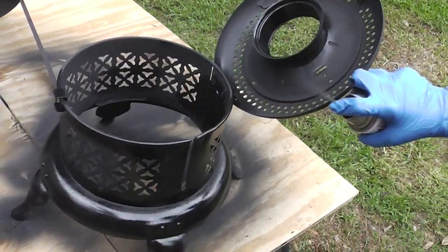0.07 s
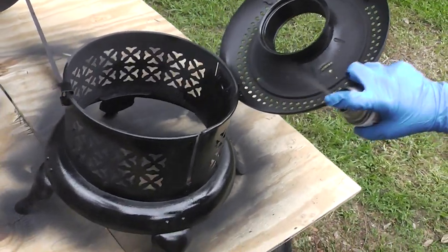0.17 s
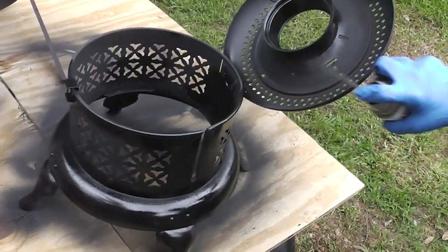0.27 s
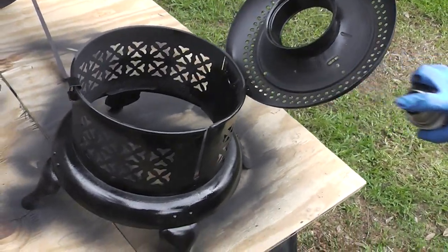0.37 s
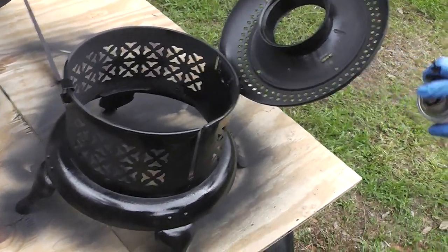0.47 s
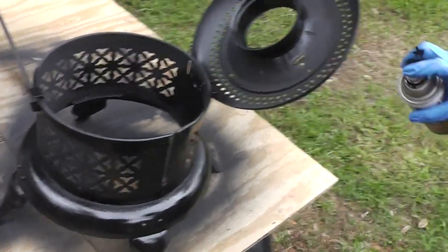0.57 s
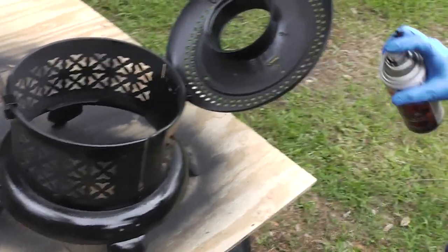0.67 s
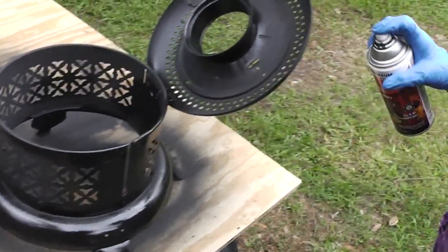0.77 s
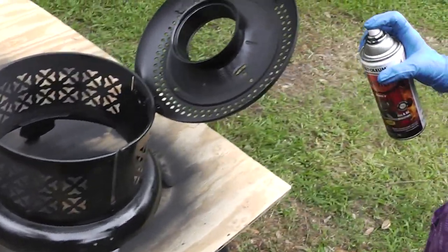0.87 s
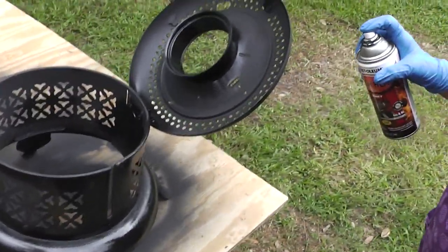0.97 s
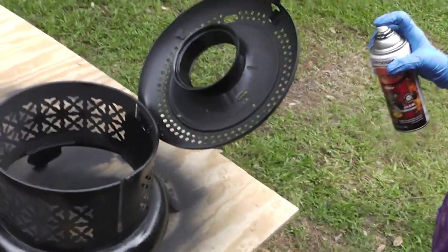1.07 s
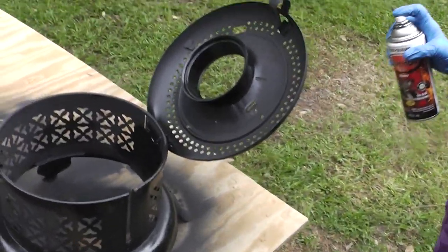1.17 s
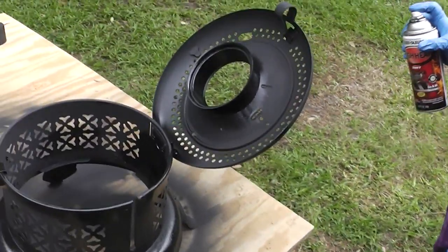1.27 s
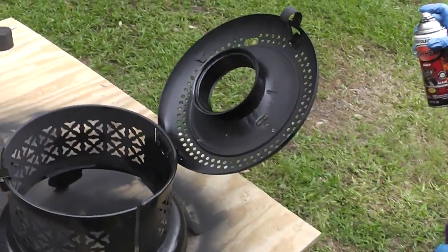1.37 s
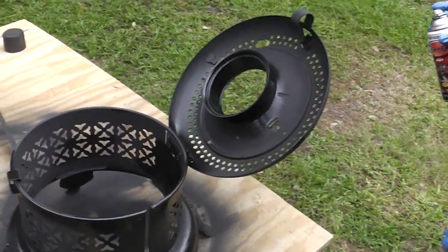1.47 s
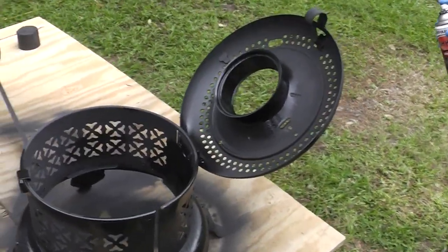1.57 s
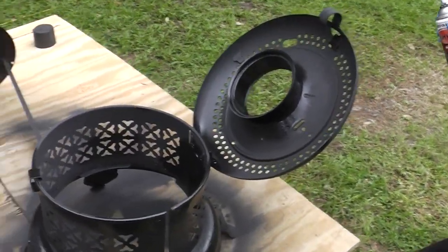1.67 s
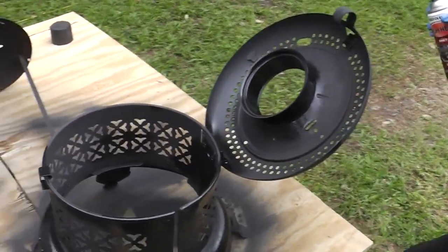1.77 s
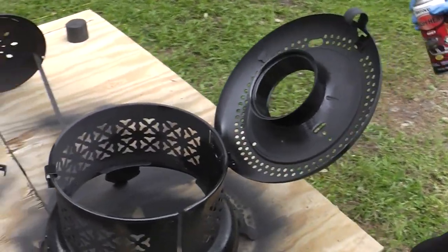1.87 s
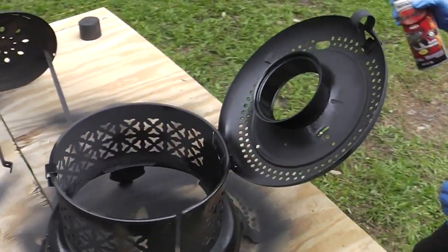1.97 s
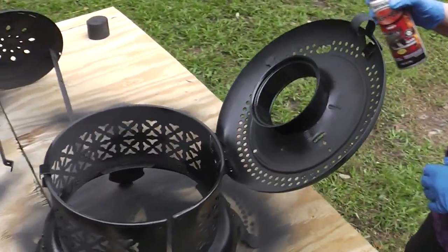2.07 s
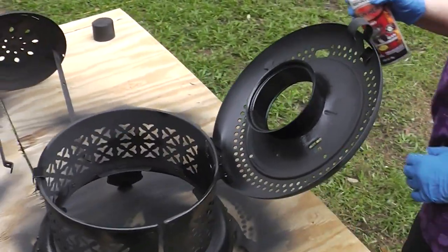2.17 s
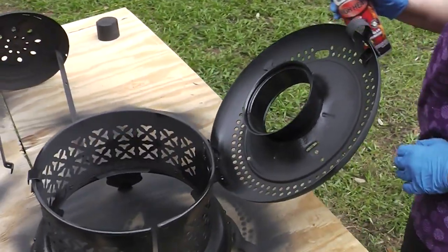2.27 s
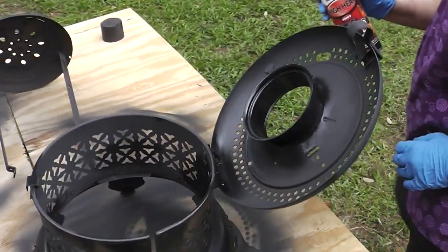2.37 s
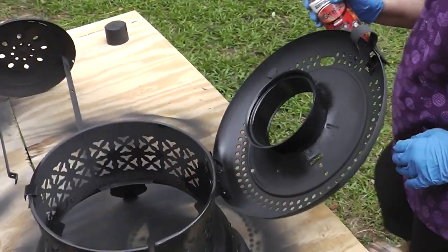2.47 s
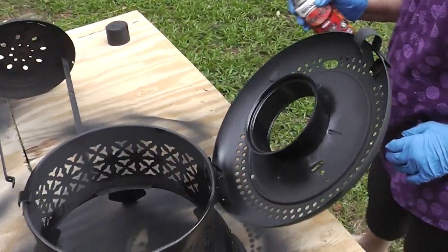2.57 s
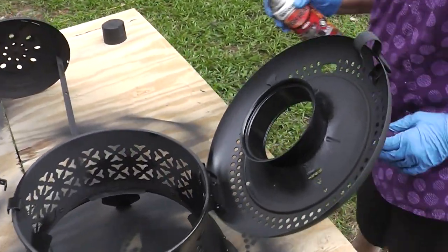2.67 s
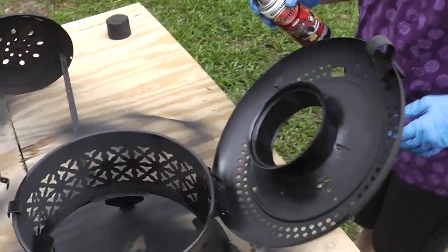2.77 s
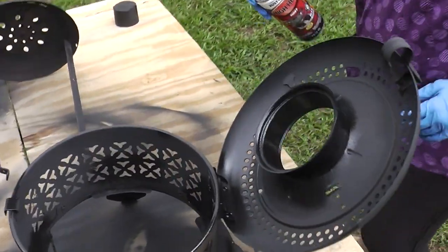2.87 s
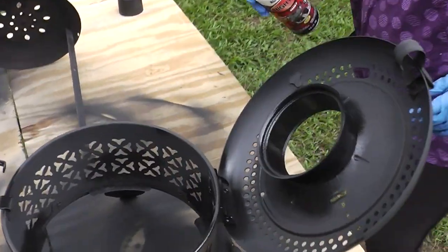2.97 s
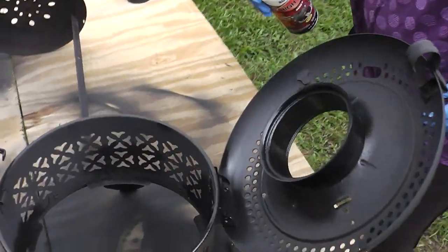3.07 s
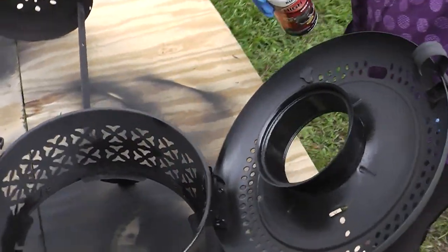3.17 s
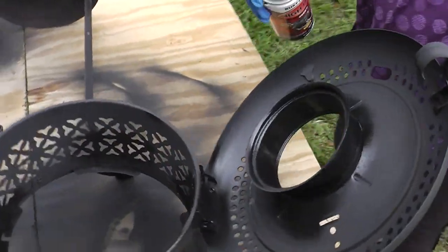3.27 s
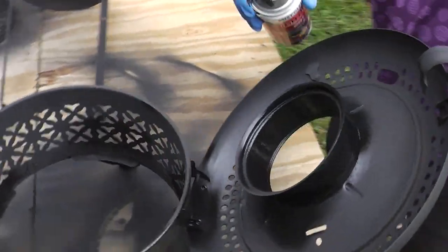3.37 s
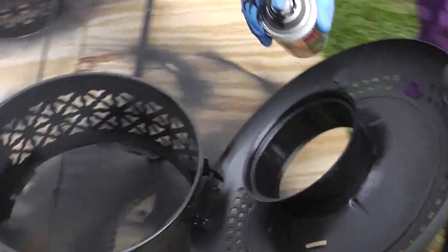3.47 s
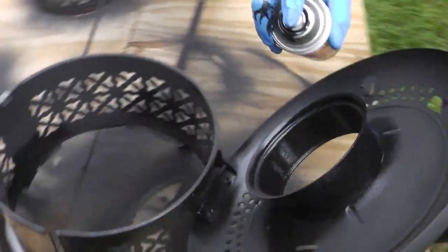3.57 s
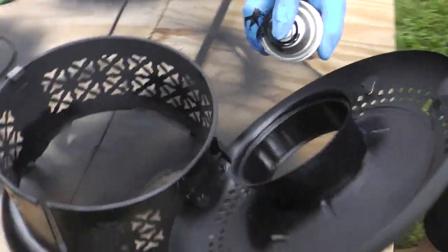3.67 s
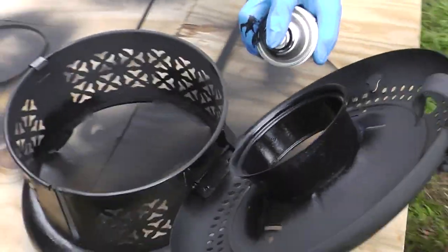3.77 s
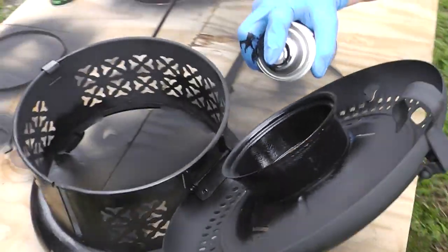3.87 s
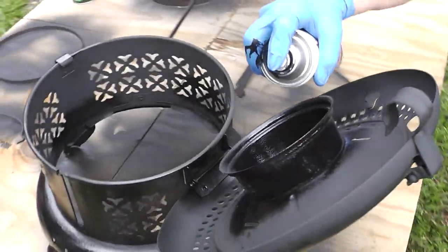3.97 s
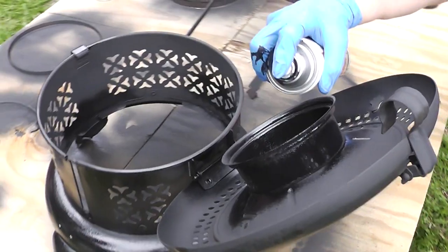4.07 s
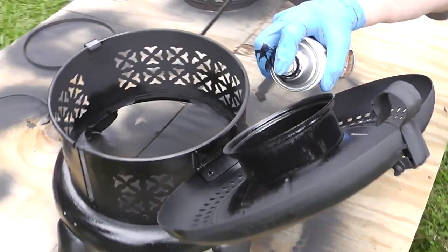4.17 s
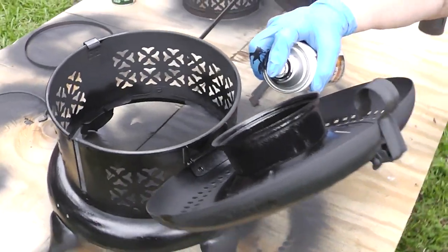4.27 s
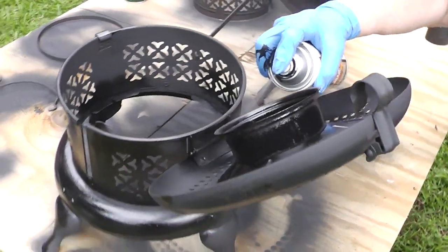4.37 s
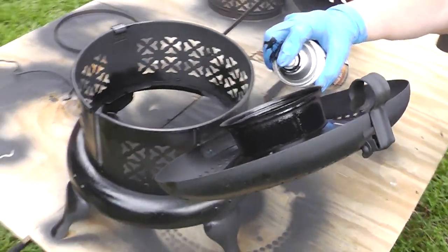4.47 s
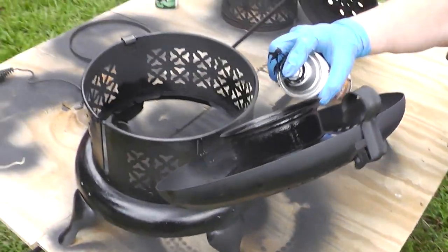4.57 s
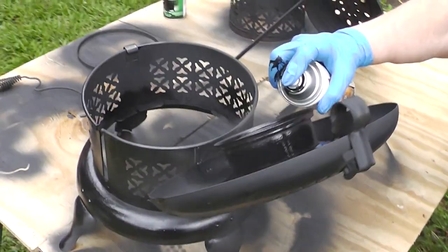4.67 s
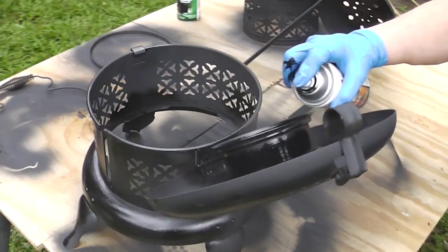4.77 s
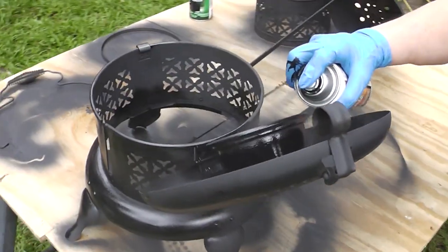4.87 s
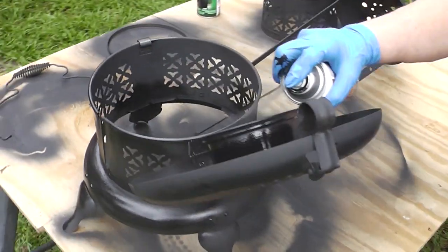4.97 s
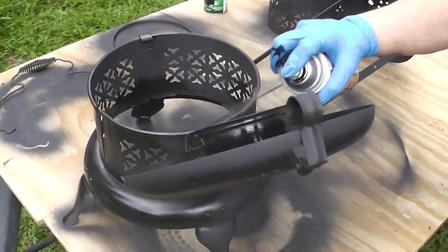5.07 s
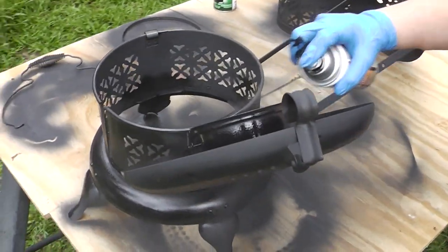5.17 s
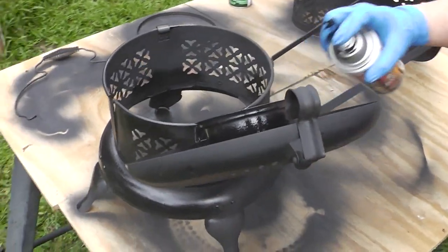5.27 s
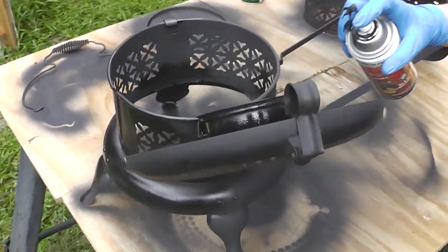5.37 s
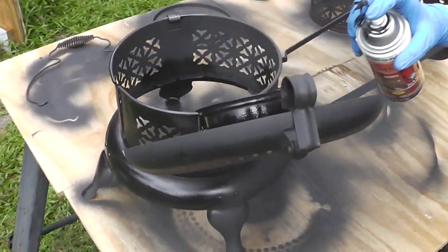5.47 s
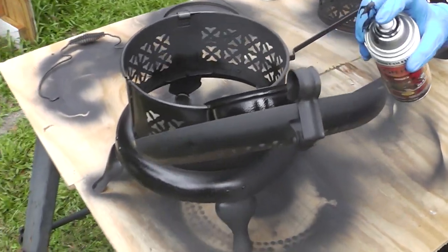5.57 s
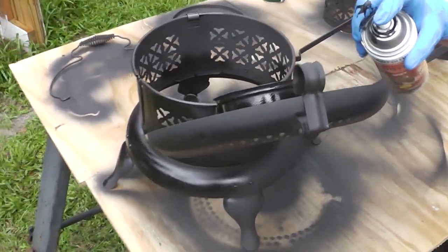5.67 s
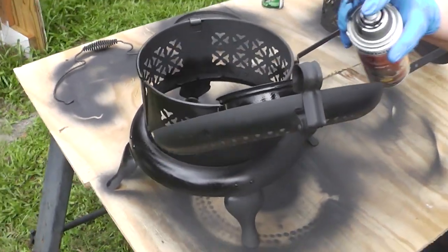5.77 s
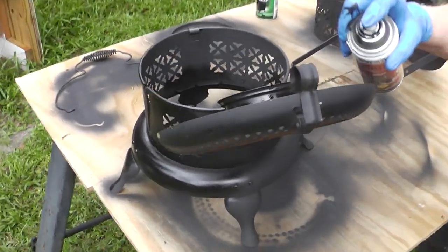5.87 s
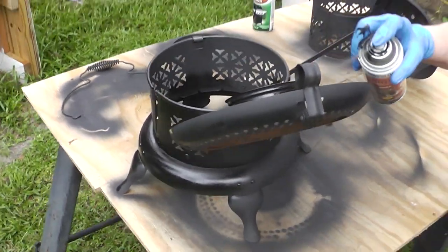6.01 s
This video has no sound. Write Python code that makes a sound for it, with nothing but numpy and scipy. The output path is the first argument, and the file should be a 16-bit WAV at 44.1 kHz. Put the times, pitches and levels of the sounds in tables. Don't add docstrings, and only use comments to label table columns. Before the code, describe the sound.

A crisp, turbulent aerosol jet cuts off, followed by a quick irregular rattle inside the can. A quieter stretch holds soft clothing movement, tiny metallic clicks, thin high bird notes blurred by trees and faint far calls, above steady low traffic. Then the hiss returns for about a second, its colour shifting as the hand moves near metal, pauses, and begins again. Close spraying, open air, sound leaning right.

```python
import sys
import numpy as np
from scipy import signal
from scipy.fft import rfft, irfft
from scipy.io import wavfile
from scipy.ndimage import uniform_filter1d, minimum_filter1d, map_coordinates

SR = 44100
rng = np.random.default_rng(int(sys.argv[2]) if len(sys.argv) > 2 else 0)


def voltage_ratio(decibels):
    exponent = np.asarray(decibels, float) / 20
    return 10 ** exponent


def unload_wav(signal):
    wavfile.write(
        sys.argv[1],
        SR,
        np.round(np.clip(np.atleast_2d(signal).T, -1, 1) * 32767).astype(np.int16),
    )


N = 266364
T = np.arange(N) / SR
HZ = np.maximum(np.fft.rfftfreq(N, 1 / SR), 1)


def over_hz(table):
    hz, value = np.transpose(table)[:2]
    return np.interp(np.log(HZ), np.log(hz), value)


def over_time(table):
    s, *columns = np.transpose(table)
    return [np.interp(T, s, c) for c in columns]


def shape(x, gain):
    return irfft(rfft(x) * gain, N)


def split(x, edges_hz, soft):
    lows = [0] + [1 / (1 + (HZ / e) ** (1 / soft)) for e in edges_hz] + [1]
    spectrum = rfft(x)
    return [irfft(spectrum * (b - a), N) for a, b in zip(lows, lows[1:])]


def unit(x):
    return x / np.sqrt(np.mean(x ** 2))


def walk(rate):
    k = int(SR / rate)
    held = np.repeat(rng.standard_normal(N // k + 1), k)
    return 1.57 * uniform_filter1d(uniform_filter1d(held, k), k)[:N]


def ramp(start, end, rise, fall):
    return np.clip(np.minimum((T - start) / rise, (end - T) / fall), 0, 1)


def echoes(x, delays_ms, shares):
    crisp = shape(x, 4 / (3 + np.cos(2 * np.pi * HZ / SR)))
    out = 0
    for ms, share in zip(delays_ms, shares):
        place = np.arange(N) - ms * SR / 1000
        out = out + share * map_coordinates(crisp, [place], order=2, prefilter=False)
    return out


# (frequency [Hz], level [dB])
PORT_LEVEL = [(60, -3.0), (110, -3.0), (200, -3.0), (380, -3.0), (700, -18), (1290, -2), (2380, -1),
              (4400, 1.5), (8120, -4), (15000, -3)]
# (frequency [Hz], phase [radians])
PORT_PHASE = [(0, 0), (1120, 0.5), (1890, 0.28), (7410, 0.35), (9650, 0.028), (11300, 0.061), (12000, 1.3),
              (12200, 0.78), (12800, 1.8), (13300, 1.5), (13500, 1.6), (14300, 0.3), (16400, 0.0)]
# (frequency [Hz], level [dB])
PORT_NOTCH = [(6000, 0), (9500, 1.5), (11800, -5.5), (13200, -0.5), (14500, 9), (16000, 14)]
# (frequency [Hz], likeness [0-1])
PORT_LIKENESS = [(1000, 1), (2500, 1), (9000, 1), (11500, 0.87), (13800, 0.74), (15800, .75)]


def from_right(x, unlike=None):
    tilt_db = over_hz(PORT_LEVEL) + over_hz(PORT_NOTCH)
    tilt = voltage_ratio(tilt_db / 2) * np.exp(.5j * over_hz(PORT_PHASE))
    alike = over_hz(PORT_LIKENESS)
    mid = rfft(x) * np.sqrt((1 + alike) / 2)
    side = 0 if unlike is None else rfft(unlike) * np.sqrt((1 - alike) / 2)
    return np.array([irfft((mid + side) * tilt, N), irfft((mid - side) / tilt, N)])


# (opens [s], press takes [s], shut [s], jet level [dB])
PRESSES = [
    (-.2, .05, .439, -25),
    (4.297, 0.059, 5.264, -23),
    (5.873, 0.12, 6.3, -22.5),
]


def valve_flow():
    let_go, snap, snap_share = 0.036, 0.011, 0.094
    jet_gain = mist_gain = 0
    for opens, press, shut, db in PRESSES:
        eased = ramp(opens, shut, press, let_go)
        snapped = ramp(opens + .004, shut, snap, snap)
        valve = (1 - snap_share) * eased + snap_share * snapped
        dribble = (T > shut - let_go) * voltage_ratio(-42 - 60 * np.abs(T - shut) / 0.18)
        jet_gain = jet_gain + voltage_ratio(db) * (valve ** 1.56 + dribble)
        mist_gain = mist_gain + voltage_ratio(db) * (valve ** 0.91 + 4 * dribble)
    return jet_gain, mist_gain


# (frequency [Hz], level per Hz [dB])
JET_COLOUR = [(600, -24), (1300, -4), (2200, -8.5), (2750, -17.5), (3200, -23), (3700, -24), (4300, -19),
              (5800, -14.5), (7300, -8), (8300, -3), (10500, 2), (12200, 0.5), (13300, -1), (16000, -2)]
# (time [s], landing on metal [0-1], turned to camera [0-1], hidden by the lid [0-1])
AIM = [(0, 1, 0, 0), (.05, 0.79, 0.4, 0), (.33, 0.71, 0.5, 0), (.4, 0.65, 0, 0.5), (4.35, 0.12, 0.2, 0),
       (4.4, 0.32, 0.4, 0.45), (4.65, 0.51, 0.8, 0.06), (4.79, 0.5, 0, 0.96), (4.85, 0.78, .85, 0.34),
       (5.0, 0.47, 0.5, 0.56), (5.12, 0.27, 0.1, 0.95), (5.165, 0.56, 0.2, 1), (5.23, 0.48, 0, 1),
       (5.9, 0.41, 0, 0), (6.04, 0.5, 0, 0.1)]
# (time [s], blowing into the pot [0-1], drumming on the lid [0-1])
MIST = [(0, 0.3, .9), (.12, 0.8, 1), (.4, .1, 0.6), (4.35, 0.5, 0.9), (4.55, 0.35, .7), (4.72, 0.4, 0.1),
        (4.79, .3, .1), (4.83, 0.5, 0), (4.93, .8, 0), (4.98, 0, 0.1), (5.1, 0.1, 0.5), (5.25, 0.7, 0.5),
        (5.9, 0, 0), (6.04, 0, 0)]
# (time [s], lid echo [ms], share, pot echo [ms], share, board echo [ms], share)
HAND = [(0, .26, .22, .65, 0, 1.77, .15), (.07, .26, .15, .645, -.28, 1.6, 0),
        (.13, .26, .12, .65, -.1, 1.11, 0), (.18, .255, .14, .65, 0, 1.105, -.28),
        (.25, .25, .1, .66, -.1, 1.11, -.22), (.31, .255, .1, .65, -.22, 1.11, -.34),
        (.36, .26, .12, .63, -.15, 1.11, -.05), (.42, .27, .2, .6, 0, 1.02, -.15),
        (4.3, .455, .5, .95, .2, 1.43, .15), (4.4, .46, .5, .955, .22, 1.43, .15),
        (4.48, .485, .35, .965, .2, 1.44, -.15), (4.55, .51, .25, .97, .15, 1.44, 0),
        (4.6, .4, 0, .85, 0, 1.42, -.1), (4.68, .345, .2, .7, -.12, 1.43, -.18),
        (4.76, .335, .2, .745, .15, 1.47, .1), (4.82, .35, 0, .75, .2, 1.49, .12),
        (4.89, .44, .1, .75, .22, 1.45, 0), (4.905, .45, .12, .66, -.1, 1.45, 0),
        (4.94, .465, .15, .67, -.33, 1.44, 0), (4.99, .475, .24, .69, -.3, 1.43, -.05),
        (5.03, .48, .26, .805, -.3, 1.435, -.28), (5.1, .49, .24, .81, -.24, 1.445, -.34),
        (5.17, .5, .18, .81, -.26, 1.445, -.22), (5.25, .5, .2, .82, -.05, 1.43, -.15),
        (5.9, .47, .25, .88, .15, 2.0, .15), (6.04, .57, .2, .75, .15, 2.0, .15)]
# (time [s], depth [0-1])
JET_NOTCH = [
    (0, 0.46),
    (.45, 0.97),
    (4.3, 0.1),
    (4.6, 0.26),
    (6.04, .2),
]


def spray():
    jet_gain, mist_gain = valve_flow()
    landing, turned, hidden = over_time(AIM)
    pot, lid = over_time(MIST)
    mist = mist_gain * voltage_ratio(-29.5 + 17.5 * landing)
    gains = (mist * voltage_ratio(-3.5 + 3 * pot),
             mist * voltage_ratio(-13.5 + 5.5 * lid),
             mist_gain * voltage_ratio(-25 + 11 * landing),
             jet_gain * voltage_ratio(-9.5 - 10.5 * hidden),
             jet_gain,
             jet_gain * voltage_ratio(-15 + 12 * turned))
    paths = over_time(HAND)
    for ms in (1.22, 1.62, 1.85, 2.1, 2.45):
        paths += [ms + .08 * walk(4), .08 * walk(8)]
    flutter_db = .6 * walk(14) + .6 * walk(45)
    own_db = [1.53 * walk(12) for _ in gains]
    notch_depth, = over_time(JET_NOTCH)
    both = []
    for _ in range(2):
        jet = shape(rng.standard_normal(N), voltage_ratio(over_hz(JET_COLOUR)))
        jet = jet + 0.97 * echoes(jet, paths[::2], paths[1::2])
        jet = jet - notch_depth * shape(jet, np.exp(-((HZ - 3200) / 200) ** 2))
        bands = split(jet, (2360, 3096, 5600, 7380, 13130), soft=0.059)
        both.append(sum(unit(b) * g * voltage_ratio(flutter_db + o) for b, g, o in zip(bands, gains, own_db)))
    return from_right(*both)


# (frequency [Hz], level per Hz [dB])
ROAD_COLOUR = [(11, -28), (18, -8), (70, -0.5), (161, -9), (201, -12), (229, -14), (273, -14.5), (371, -16),
               (462, -17.5), (527, -13), (892, -15.5), (1040, -17.5), (1920, -31.5), (2500, -50.5),
               (3400, -59), (4420, -82), (7480, -120)]


def road():
    mid, side = (shape(rng.standard_normal(N), voltage_ratio(over_hz(ROAD_COLOUR))) for _ in range(2))
    both = mid + shape(side, np.clip(0.073 + HZ / 9000, 0, 1)) * np.array([[1], [-1]])
    rumble, roar = split(both, (200,), soft=0.3)
    sides = np.array([[-1], [1]])
    rumble = unit(rumble) * voltage_ratio(-36.58 + 0.12 * walk(5.6) + 1.57 * sides)
    roar = unit(roar) * voltage_ratio(-38.45 + .5 * walk(5.4) + 1.2 * sides)
    return rumble + roar


def own_noise():
    return shape(rng.standard_normal((2, N)), voltage_ratio(-71) * HZ / 12000)


# (time [s], lasts [s], rustle level [dB], low part level [dB], share from the right [0-1])
MOVEMENTS = [(.42, 0.09, -57, -71, 0), (0.58, 0.17, -79, -63.5, .3), (0.802, 0.036, -68, -64, 0.3),
             (0.846, 0.088, -62.5, -61.5, 0.8), (0.997, 0.048, -69, -67, 0.5), (1.377, .08, -64, -71, 0.4),
             (1.45, .05, -58.5, -64.5, 0.9), (1.55, .07, -66, -72, .4), (1.714, 0.12, -66, -78, .3),
             (1.932, 0.094, -65, -70.5, 0.8), (2.09, 0.16, -67.5, -69, 0.8), (2.229, 0.047, -55, -59, 0.8),
             (2.308, 0.33, -58, -65, 0.83), (2.814, 0.28, -65.5, -64.5, 0.36), (3.27, 0.2, -63, -67.5, 0.7),
             (3.551, 0.21, -58, -66, 0.7), (3.85, 0.067, -64, -79, 0.4), (4.118, 0.21, -67, -70.5, 0.7),
             (5.247, 0.036, -59, -62, 0.2), (5.33, .14, -85, -65.5, .3), (5.47, 0.055, -59.5, -66, 0.8),
             (5.526, 0.059, -54.5, -60.5, 1), (5.598, 0.17, -57, -68, 0.75), (5.764, .04, -58, -65, .5)]
# (frequency [Hz], level per Hz [dB])
CLOTH_COLOUR = [(1500, -24), (2500, -13.5), (3300, -15.5), (4000, -9.5), (5500, -6), (7300, -6.5),
                (8200, -8), (10800, 2.5), (13000, 2.5), (16000, -4)]


def rustle():
    high, low = voltage_ratio(2 * -71), voltage_ratio(2 * -70)
    right = 0.25 * high
    rise = 0.039
    for s, lasts, db, low_db, share in MOVEMENTS:
        fall = 0.061 + 0.4 * lasts
        power = ramp(s - rise / 2, s + lasts + fall, rise, fall) ** 2
        high = high + voltage_ratio(2 * db) * power
        low = low + voltage_ratio(2 * low_db) * power
        right = right + share * voltage_ratio(2 * db) * power
    right = np.clip(right / high, 0, 1)
    grain = voltage_ratio(np.minimum(1.6 * rng.exponential(size=N // 40 + 1), 6)).repeat(40)[:N]
    gains = (np.sqrt(low), voltage_ratio(1.5) * np.sqrt(np.sqrt(low * high)), np.sqrt(high))
    layers = []
    for _ in range(4):
        hiss = shape(rng.standard_normal(N) * grain, voltage_ratio(over_hz(CLOTH_COLOUR)))
        bands = split(hiss, (5800, 9500), soft=0.076)
        layers.append(sum(unit(b) * g * voltage_ratio(0.2 * walk(20)) for b, g in zip(bands, gains)))
    ahead = layers[0] + 0.76 * layers[1] * np.array([[1], [-1]])
    return ahead * np.sqrt(1 - right) + from_right(layers[2], layers[3]) * np.sqrt(right)


def knocks(events, modes, mid_db, crack_t60, ring_db, lead_db, tail_db, tail_t60):
    size, before = 4096, 64
    out, t = np.zeros(N + size), np.arange(size) / SR
    bins = np.log(np.fft.rfftfreq(size, 1 / SR) + 1)
    colour_hz = np.log([700, 1600, 2700, 3200, 3700, 5000, 6000, 9000, 10200, 13000, 16000])
    hz, db, t60 = np.array(modes, float).T[:, :, None]
    strongest_db = max(e[1] for e in events)
    for s, peak_db, low_db, top_db, lead_hz in events:
        chance = rng.standard_normal((2, len(modes), 1))
        fade = voltage_ratio(db + 1.2 * chance[0] - 60 * t / np.minimum(t60, .03))
        rings = fade * np.sin(2 * np.pi * hz * (1 + 0.0047 * chance[1]) * t)
        lead = voltage_ratio(lead_db - 60 * t / (0.92 * crack_t60)) * np.sin(2 * np.pi * lead_hz * t)
        ring = voltage_ratio(ring_db) * rings.sum(0) + lead
        decay = voltage_ratio(-60 * t / crack_t60) + voltage_ratio(-11.0 - 60 * t / 0.0028) + voltage_ratio(tail_db - 60 * t / tail_t60)
        crack = rng.standard_normal(size) * decay
        blow = 0.56 * crack + voltage_ratio(0.2 * (peak_db - strongest_db)) * ring
        blow = blow * np.minimum(t / 0.00059, 1)
        blow = 2.01 * blow / np.abs(blow).max()
        colour_db = np.interp(bins, colour_hz, [
            low_db - 7, low_db + 6.5, low_db - 1.5, mid_db + 4.0, mid_db + 9.5, mid_db + 6.5,
            0, 0, top_db, top_db, top_db - 17])
        i = int((s + .0006) * SR) - before
        out[i:i + size] += voltage_ratio(peak_db) * irfft(rfft(np.roll(blow, before)) * voltage_ratio(colour_db), size)
    return out[:N]


# (time [s], peak level [dB], low part [dB], top part [dB], clearest ring [Hz])
RATTLE = [(0.5128, -16.5, -1, -2, 7850), (0.558, -28, 2, -3, 10900), (0.5834, -32.5, 7, 0, 6360),
          (0.6059, -37.5, 3, 0, 4200), (0.638, -50, -10, -2, 8200), (0.6657, -41, -6, 0, 4100),
          (0.684, -50, -6, 0, 4200), (0.696, -52, -10, -3, 8500), (0.7054, -18, -4, -5, 10320),
          (0.7316, -48, -9, -12, 4140), (0.7595, -52, 9, 4, 3870), (0.772, -23, -3, -2.5, 10280),
          (0.7977, -35, 7, -5, 4680), (0.817, -31, 4, -5, 4540), (0.830, -41, -4, -4, 8600),
          (0.840, -43, -8, -3, 9400), (0.8478, -41, -6, -2, 9200), (1.007, -44.5, -12, 1, 9890),
          (1.1267, -53, -10, -2, 9600), (1.1432, -54, -2, 8, 5030)]
# (frequency [Hz], level [dB], 60 dB decay [s])
CAN_MODES = [(2094, -30, 5.0), (3850, 7, 0.0039), (4700, -7, 0.034), (6870, -6, 0.025), (7440, -3, 0.018),
             (8330, -1, 0.019), (9700, -17, 0.037), (10150, -1, 0.02), (11000, 5, 0.017),
             (11500, -6, 0.023), (13900, -25, 0.04), (14400, -16, 0.021)]


def rattle():
    blows = knocks(RATTLE, CAN_MODES, mid_db=-9.0, crack_t60=0.024, ring_db=-8.5, lead_db=-3,
                   tail_db=-22, tail_t60=0.031)
    return from_right(blows)


# (start [s], end [s], first pitch [Hz], width [Hz], level [dB])
FAINT = [
    (0.556, 0.949, 4300, 505, -64.5),
    (0.593, 0.99, 2143, 900, -55.5),
    (1.25, 1.602, 3340, 120.3, -74),
    (2.835, 3.301, 4300, 996, -67),
    (2.836, 3.25, 3090, 1400, -69),
    (2.898, 3.301, 2150, 451, -60.5),
    (5.256, 5.543, 2950, 2700, -65),
    (5.8, 5.88, 3520, 99.4, -77),
]


def faint_calls():
    out = 0
    for start, end, first_hz, width_hz, db in FAINT:
        last_hz = first_hz * (1 - 0.043)
        hz, level_db = over_time([(start - .02, first_hz, -110), (start, first_hz, db),
                                  (end - .05, last_hz, db - 1.5), (end + .2, last_hz, -110)])
        tone = np.sqrt(2) * np.sin(2 * np.pi * np.cumsum(hz) / SR)
        out = out + voltage_ratio(level_db) * walk(width_hz) * tone
    return out


# (time [s], peak level [dB], low part [dB], top part [dB], clearest ring [Hz])
TICKS = [(1.338, -41.5, 2, -25, 5600), (1.463, -45, -10, 3, 9000), (2.2557, -31.5, 0.5, -5, 4610),
         (2.788, -49, -20, 2, 5530), (2.977, -35, -26, 0, 9470), (3.390, -38.5, 8, -14, 2050),
         (3.473, -58, 5, 2, 11000), (3.588, -47, -12, -4, 5000), (3.766, -53, -12, 0, 10000),
         (4.255, -45, -12, -6, 5070), (4.285, -44, -14, -4, 5000), (5.795, -39.5, 5, -10, 2900)]
# (time [s], peak level [dB], low part [dB], top part [dB], clearest ring [Hz])
SNAPS = [
    (1.54, -50, -12, 0, 10300),
    (1.59, -54, -14, -4, 9500),
    (1.733, -52, -16, 4, 12000),
    (3.086, -46, -16, 2, 10000),
    (3.3876, -27.5, -30, -5, 8900),
    (4.017, -46, -18, 2, 9700),
    (5.415, -47, -22, -3, 9000),
    (5.54, -42, -16, 4, 10500),
]
# (frequency [Hz], level [dB], 60 dB decay [s])
PART_MODES = [(2050, 1, 0.05), (3280, -16, .012), (4270, 8, 0.0097), (5600, 0, 0.0068), (6300, 6, 0.013),
              (7000, -20, 0.013), (8550, 0.5, 0.0073), (9700, 9.5, 0.022), (10900, 15, 0.0084),
              (13100, -9, 0.0031), (14200, 11, .007), (14900, -11, 0.0068)]


def handled_parts():
    ticks = knocks(TICKS, PART_MODES, mid_db=-6, crack_t60=0.007, ring_db=-17, lead_db=3.5,
                   tail_db=-8, tail_t60=0.07)
    snaps = knocks(SNAPS, PART_MODES, mid_db=-19, crack_t60=0.013, ring_db=-14, lead_db=0.5,
                   tail_db=-11, tail_t60=0.062)
    return ticks + snaps


# (time [s], glide [s], first pitch [Hz], knee pitch [Hz], top pitch [Hz], level [dB])
BIRD = [
    (1.367, 0.029, 5870, 7400, 7910, -44.5),
    (1.653, 0.068, 6160, 8270, 9150, -52),
    (2.583, 0.037, 6050, 7620, 8960, -47),
    (2.825, 0.034, 7150, 8000, 9200, -50),
    (3.153, 0.048, 6600, 7990, 9250, -50),
]


def bird():
    flick, flick_db = 0.0217, -12.5
    voice = 0
    for s, glide, first_hz, knee_hz, top_hz, db in BIRD:
        knee = s + glide
        hz = first_hz + (knee_hz - first_hz) * np.clip((T - s) / glide, 0, 1) ** 0.58
        hz = hz + (top_hz - knee_hz) * np.sin(np.pi / 2 * np.clip((T - knee) / flick, 0, 1))
        level_db, = over_time([(s - .003, -70), (s, -12.5), (s + 0.013, -2), (knee, 0),
                               (knee + 0.81 * flick, flick_db), (knee + flick, flick_db),
                               (knee + flick + .003, -70)])
        voice = voice + np.sqrt(2) * voltage_ratio(db + level_db) * np.sin(2 * np.pi * np.cumsum(hz) / SR)
    t = T[:SR // 2]
    fade = voltage_ratio(-60 * t / 0.48) * np.minimum(t / 0.0044, 1)
    trees = rng.standard_normal((3, len(t))) * fade / np.sqrt(np.sum(fade ** 2))
    common, left, right = (signal.fftconvolve(voice, r)[:N] for r in trees)
    blur = common + .5 * np.array([left, right])
    direct = voice * voltage_ratio(np.array([[-7], [7]]))
    return direct + voltage_ratio(7) * blur


def scene():
    near = spray() + rustle() + rattle() + handled_parts()
    far = road() + faint_calls() + bird()
    return near + far + own_noise()


def starve(x):
    how = dict(fs=SR, window="cosine", nperseg=2048, noverlap=1024)
    hz, _, z = signal.stft(x, **how)
    power = (np.abs(z[:, :1024]) ** 2).mean(0).reshape(128, 8, -1).mean(1)
    power = uniform_filter1d(power, size=2, axis=1)
    khz = hz[:1024].reshape(128, 8).mean(1)[:, None] / 1000
    treble = power[(khz[:, 0] > 8) & (khz[:, 0] < 12.5)].mean(0)
    limit_db = -27.5 + 2.3 * np.clip(khz - 3.2, 0, 2.6)
    weak = power < treble * voltage_ratio(2 * limit_db)
    weak &= power == minimum_filter1d(power, size=3, axis=0)
    weak &= (khz > 2.3) & (khz < 6)
    z[:, :1024] *= ~weak.repeat(8, 0)
    return signal.istft(z, **how)[1][:, :N]


def roll_off(x):
    return signal.sosfilt(signal.butter(12, 16300, fs=SR, output="sos"), x)


def record(dry):
    top_cut = signal.ellip(12, .2, 60, 15720, fs=SR, output="sos")
    mix = signal.sosfilt(top_cut, starve(dry))
    return roll_off(mix)


dry = scene()
out = record(dry)
unload_wav(out)
```